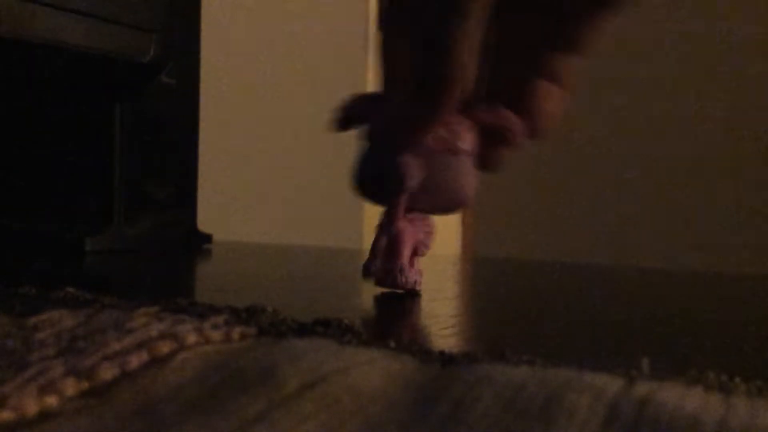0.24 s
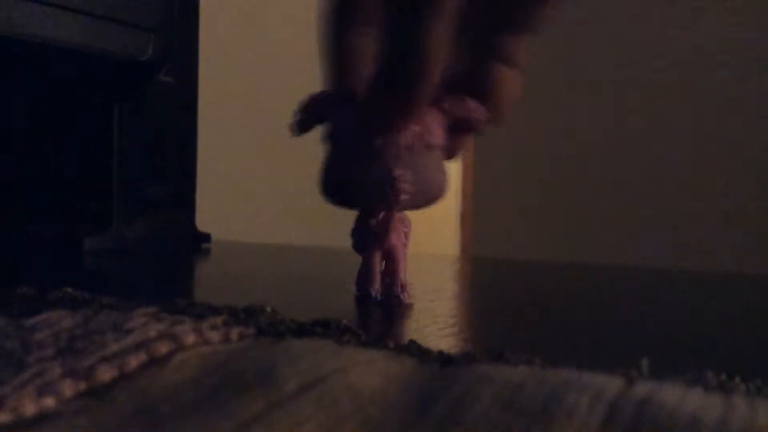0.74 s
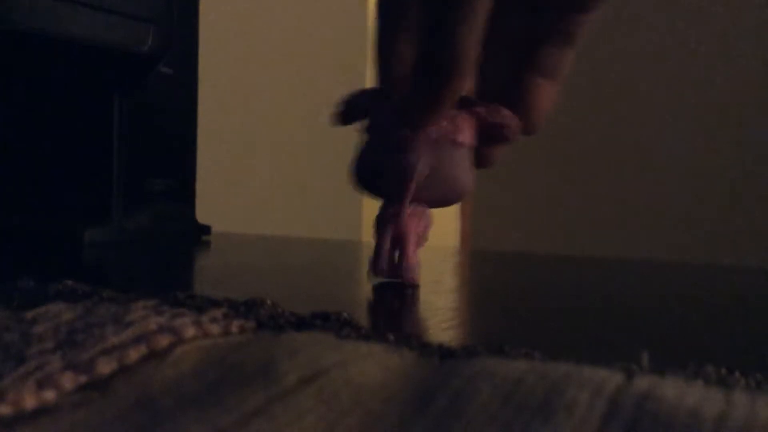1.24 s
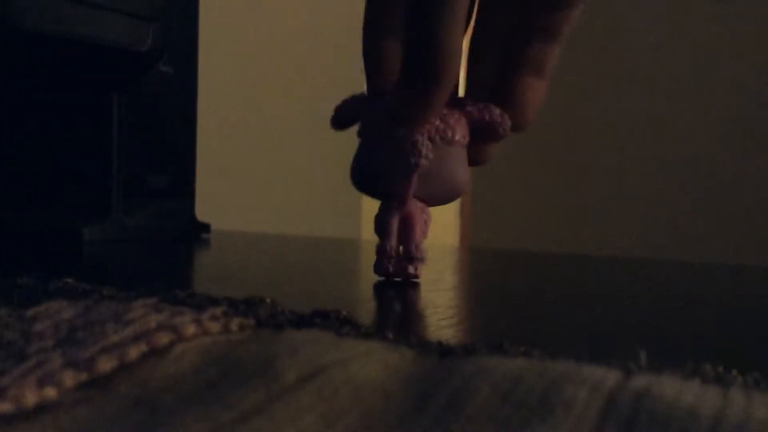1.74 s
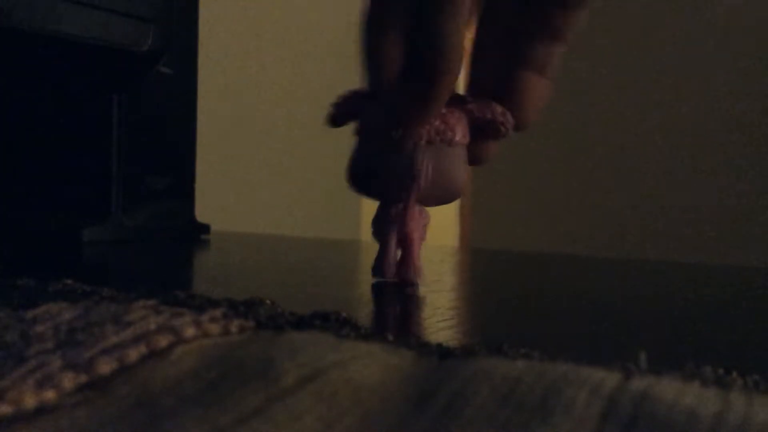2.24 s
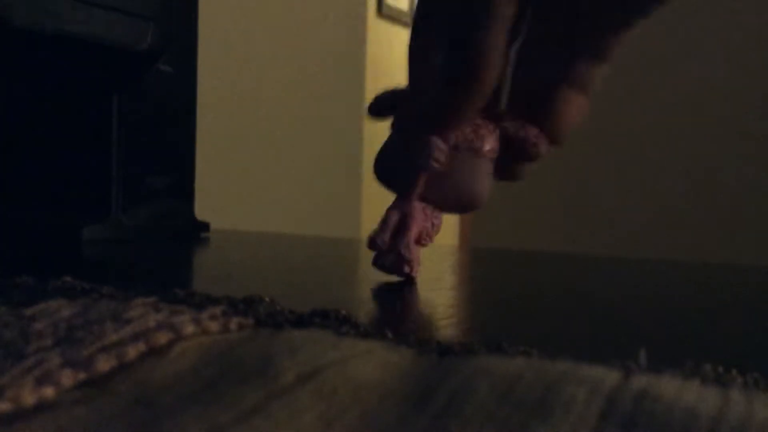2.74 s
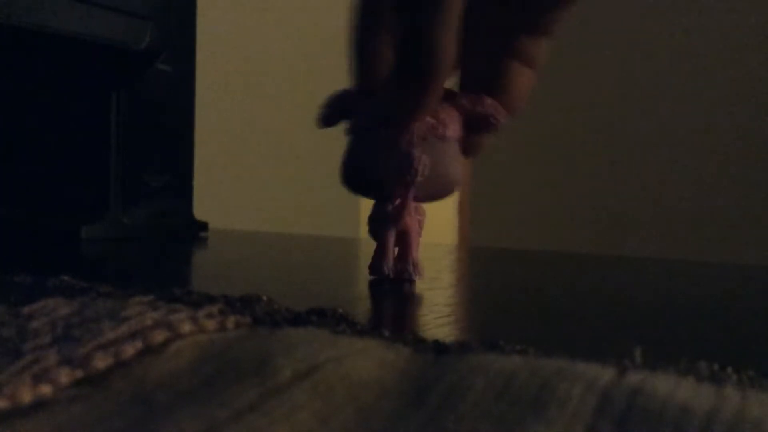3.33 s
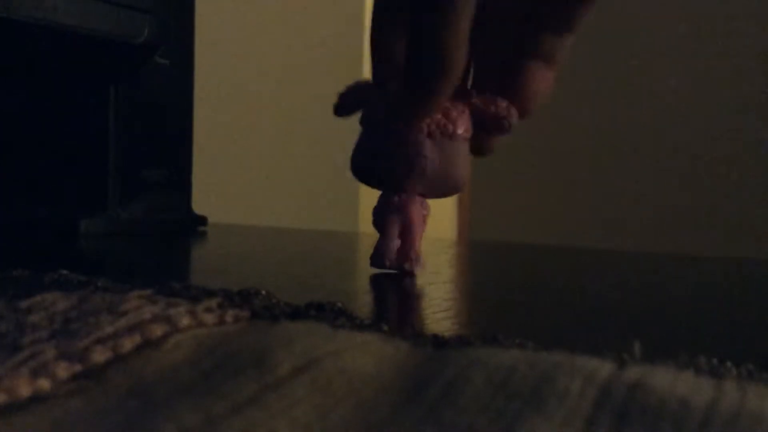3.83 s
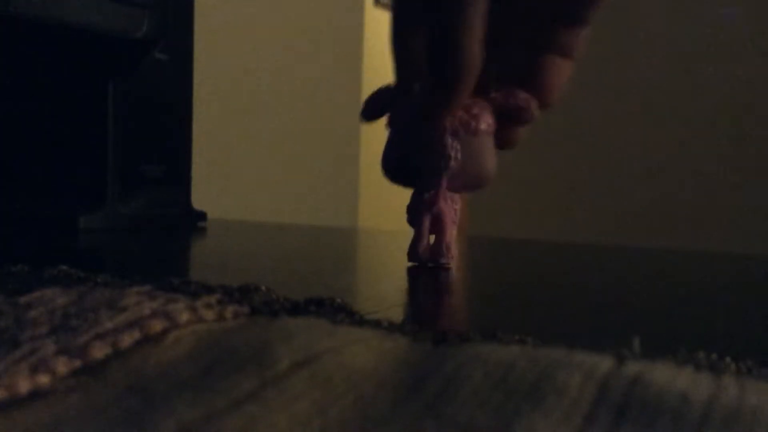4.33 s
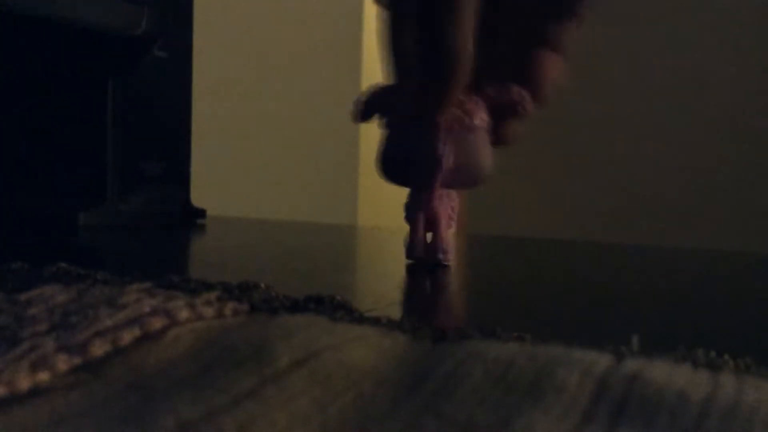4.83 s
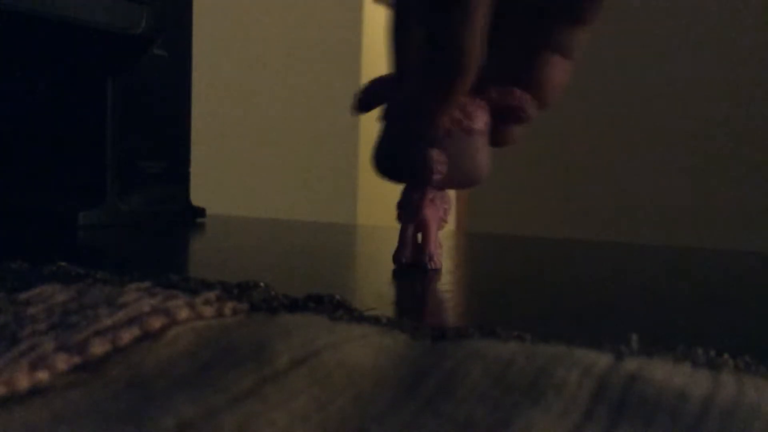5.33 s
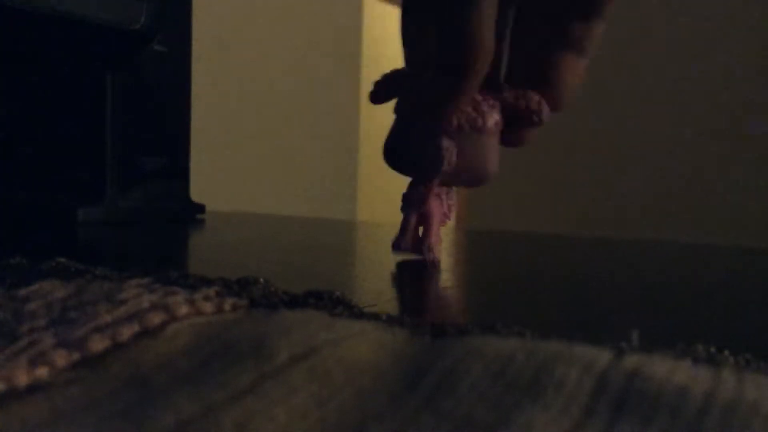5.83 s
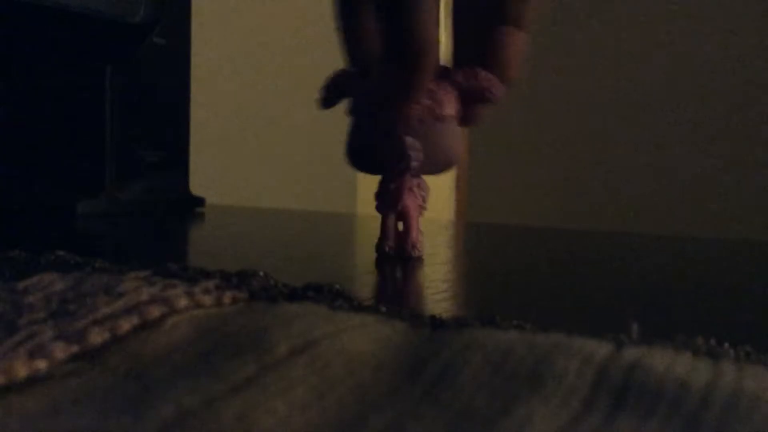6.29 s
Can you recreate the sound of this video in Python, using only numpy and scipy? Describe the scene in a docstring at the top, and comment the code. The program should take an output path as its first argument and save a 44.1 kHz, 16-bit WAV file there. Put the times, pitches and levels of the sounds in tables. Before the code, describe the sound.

Close, dry toy footsteps: dull little knocks with hollow plastic clacks and brief scuffs, hopping steadily on a hard floor in a quiet small room.

```python
"""A hand hops a small hollow plastic toy over a hard floor, close by, in a small room.
Each hop is a soft thud of decaying modes with a push-off a moment later; hard edges click and ring the toy.
Now and then a foot drags as a run of tiny random slips, and the plastic ticks in bursts of bright noise.
A diffuse tail of decaying noise follows steps and drags; filtered noise and wavering sines make the
room's faint hiss and hum."""
import sys
import numpy as np
from scipy import signal
from scipy.fft import rfft, irfft, next_fast_len
from scipy.io import wavfile
from scipy.ndimage import map_coordinates

SR = 44100
rng = np.random.default_rng(int(sys.argv[2]) if len(sys.argv) > 2 else 0)


def pcm_store(signal):
    """Save signal as 16-bit PCM."""
    levels = np.round(np.clip(np.atleast_2d(signal), -1, 1) * 32767)
    wavfile.write(sys.argv[1], SR, levels.astype(np.int16).T)


N = 288855  # scene length in samples

# A foot dragging on the floor; the first row, at the very start, is instead the hand rustling against the toy.
# Level is before the pressure curve, swell runs from start to end of the stroke: start_s, length_s, level_db,
# tilt_db_per_octave, swell_db, rasp_db
DRAGS_AND_RUSTLES = [(0, 0.098, -50, -3.5, -1.5, -1.5), (.888, 0.052, -48, -1.4, 5, -3),
                     (4.136, 0.045, -43.5, 0, 13, -4.5), (4.275, 0.043, -53, 1.5, -13, 5),
                     (5.181, 0.086, -52.5, -1, -8, 7), (6.031, 0.14, -51.5, 1.15, -16, 0.5),
                     (6.334, 0.045, -48, 1.5, -6, -3), (6.431, 0.034, -55, 0, -4, 5)]
# Relative colour of the dragging: freq_hz, level_db
DRAG_COLOUR = [(100, -35), (250, 7.5), (500, 5.5), (850, 1), (1300, 1.5), (1750, -10), (2350, -3.5),
               (3200, -13.5), (4000, -13), (7500, -26), (9700, -28.5), (15000, -40)]
# Where a hard-pressed foot rasps, and how widely
RASP_HZ, RASP_OCTAVES = 2400, 0.31

# The room's answer, levels relative: freq_hz, t60_s, level_db
ROOM_DECAY = [(122, 0.37, -7), (264, 0.13, -12), (476, 0.37, 17), (820, 0.3, 7.5), (1420, 0.17, 15.5),
              (3350, 0.19, 14.5), (6100, 0.2, 3), (12100, 0.15, 14)]
# Relative colour of the room's air noise: freq_hz, level_db_per_hz
AIR_COLOUR = [(30, -14), (50, -20.5), (80, -11.5), (105, -13.5), (150, -2.5), (260, 3.5), (380, -7.5),
              (650, -9), (900, -9), (1200, -17.5), (1550, -18.5), (1800, -24.5), (5000, -34), (9000, -37),
              (15500, -47.5)]
# Faint hum and whine: pitch_hz, level_db (rms, ahead of the microphone)
HUM_LINES = [(155, -69.5), (256, -61.5), (790, -70), (940, -70.5), (1480, -79.5), (2210, -84.5),
             (8642, -101)]

# Where thud, hollow ring, clack, snap and click lie: freq_hz
BLOW_BANDS_HZ = [260, 830, 1300, 2350, 4500]
# The toy standing on the boards; pitch and level are centres, life is the time to fall to 1/e:
# pitch_hz, level_db, life_s
TOY_AND_BOARD_MODES = [(162.6, -28.5, 0.041), (223, -17, 0.035), (257.5, -.5, 0.031), (335.5, -8.5, 0.036),
                       (366, -7, 0.021), (518, -1, 0.014), (689, -8, 0.015), (839.3, 4, 0.011),
                       (1251, 5, 0.0064), (1316, 2, 0.0036), (1610, 1.5, 0.0049), (2053, -2.5, 0.0061),
                       (2390, 9, 0.0026), (2864, 11, 0.0011), (3610, -0.5, 0.0047), (4550, 8, 0.0016),
                       (4760, 7.5, 0.00089), (5850, -43, 0.0014), (9740, 1.5, 0.0011),
                       (10500, 6.5, 0.00047)]
# Each hop, a soft landing and a later push-off: start_s, landing_db, push_off_db
TOY_HOPS = [(.156, -36.5, -43.5), (.374, -38.5, -43), (0.5995, -36.5, -46), (.794, -41.5, -45),
            (0.9964, -38.5, -46.5), (1.2799, -39.5, -57), (1.505, -39, -55), (1.737, -45.5, -55),
            (1.992, -39, -59), (2.2459, -38, -43.5), (2.476, -37.5, -48), (2.712, -38.5, -44),
            (2.9544, -40, -47.5), (3.182, -43.5, -53.5), (3.367, -48, -52), (3.58, -46.5, -50),
            (3.7938, -41.5, -53), (4.0445, -40.5, -49), (4.527, -48.5, -69), (4.6951, -40, -67),
            (4.9248, -36.5, -47.5), (5.1465, -38.5, -64), (5.3844, -39.5, -71), (5.597, -37, -64),
            (6.001, -30.5, -44)]
# How long the toy stays down before it pushes off
STANCE_S = .097
# Force of a soft landing in each blow band, relative to the hop's level: level_db
LANDING_SHAPE_DB = [-0.5, -16.5, -15, -40, -55]
# Force of a push-off in each blow band, relative to the hop's level: level_db
PUSH_OFF_SHAPE_DB = [-2, -6, -17, -22.5, -35]
# A hard edge of the toy striking the floor, or a sharp push-off as it leaves; hollow lifts the ring and lowers
# the clack by the same amount: # start_s, level_db, thud_db, hollow_db, tilt_db_per_octave
EDGE_TAPS = [(.1638, -35, -37, 4.5, -2), (.3794, -33.5, -43, 6, -2), (.6124, -35.5, -39.5, -1.5, -5.5),
             (.811, -47, -55, 0, -13.5), (1.0064, -33.5, -41.5, 1.5, -4.5), (1.143, -56.5, -49, 6, -15),
             (1.339, -58, -44, 9.5, -20), (2.1057, -47, -44.5, 1, -14), (2.2679, -39.5, -60, 3.5, -5),
             (2.489, -34.5, -53, 10, -1), (2.7298, -49.5, -55, -3, -7.5), (3.2233, -56.5, -59, 2, -20),
             (3.8555, -56, -60, 2, -20), (4.0697, -62, -47, -9, -16), (4.138, -46, -47, 2.5, -19),
             (4.1738, -34.5, -27, 4.5, -5), (4.27, -35.5, -80, 1, -10), (4.9543, -53.5, -61, 0, -13),
             (5.064, -58, -64, 8, -17), (5.1787, -48.5, -72, -1.5, -12.5), (5.194, -56, -69, 9, -15),
             (5.2405, -45, -40, 4, -18), (5.3852, -47.5, -57, -2, -19), (5.4135, -52.5, -57, -2, -15),
             (5.609, -35, -74, 4, -10), (5.8231, -45, -48, -1.5, -11.5), (6.0052, -33.5, -38.5, 0.5, -3),
             (6.2244, -38.5, -40, 7, -4.5), (6.3369, -50, -47, 2, -16), (6.4362, -54, -48, 1, -9)]

# The plastic ticking in the fingers as the grip shifts: start_s, level_db, centre_hz
PLASTIC_TICKS = [(.708, -60, 6500), (1.143, -58, 6000), (1.587, -63, 7000), (2.783, -57, 13000),
                 (2.809, -60, 8500), (5.385, -61, 6750)]

# The microphone keeps nothing from here up
TOP_HZ = 16100


def amp(db):
    """Decibels to gain."""
    return 10 ** (np.asarray(db) / 20)


def unit(x):
    """Scale to rms 1."""
    return x / np.sqrt(np.mean(x ** 2) + 1e-20)


def along(points, hz):
    """Read (frequency, value) points on a log-frequency axis."""
    point_hz, values = np.transpose(points)
    return np.interp(np.log(hz + 1), np.log(point_hz + 1), values)


def bell(hz, centre_hz, octaves):
    """A Gaussian hump on an octave scale, 1 at its centre."""
    return np.exp(-.5 * (np.log2((hz + 1) / centre_hz) / octaves) ** 2)


def filtered(x, response):
    """Shape the spectrum of x by a response of frequency."""
    size = next_fast_len(len(x) + 8192)
    spectrum = rfft(x, size) * response(np.fft.rfftfreq(size, 1 / SR))
    return irfft(spectrum, size)[:len(x)]


def wobble(rate):
    """A smooth random curve, rate knots a second."""
    knots = rng.standard_normal(int(N * rate / SR) + 4)
    return map_coordinates(knots, [np.arange(N) * rate / SR])


def add(track, start_s, sound):
    """Mix a sound into the track at its start time."""
    part = track[max(round(start_s * SR), 0):][:len(sound)]
    part += sound[:len(part)]


def drags(slip_rate=1800, grit_db=2.0, arch=0.51, uneven_db=3.5, wet_db=-12.0):
    """A sliding foot, or the hand rubbing the toy, catches and slips in a dense run of tiny ticks."""
    track = np.zeros(N)
    t = np.arange(SR // 3) / SR
    for start_s, length_s, level_db, tilt_db, swell_db, rasp_db in DRAGS_AND_RUSTLES:
        slips = (rng.random(len(t)) < slip_rate / SR) * rng.choice([-1, 1], len(t))
        slips = slips * amp(grit_db * rng.standard_normal(len(t)))
        rasping = filtered(slips, lambda hz: amp(rasp_db * bell(hz, RASP_HZ, RASP_OCTAVES)))
        rub = unit(filtered(
            rasping, lambda hz: amp(along(DRAG_COLOUR, hz) + tilt_db * np.log2((hz + 1) / 1000))))
        # the hand bears down and lifts again, a little unevenly
        stroke = np.minimum(t / length_s, 1)
        unevenness_db = swell_db * (stroke - .5) + uneven_db * wobble(95)[:len(t)]
        pressure = np.abs(np.sin(np.pi * stroke)) ** arch * amp(unevenness_db)
        scrape = amp(level_db) * rub * pressure
        add(track, start_s, scrape + amp(wet_db) * reverb(scrape))
    return track


def reverb(sound, delay_s=0.002, build_s=0.01):
    """The room's diffuse answer: noise decaying band by band, swelling in as the first walls reply."""
    hz, t, noise = signal.stft(rng.standard_normal(SR // 3), SR, nperseg=256)
    room = np.array(ROOM_DECAY)
    level_db = along(room[:, [0, 2]], hz)[:, None]
    t60 = along(room[:, :2], hz)[:, None]
    tail = signal.istft(noise * amp(level_db - 60 * t / t60), SR, nperseg=256)[1]
    tail = tail * np.clip((np.arange(len(tail)) / SR - delay_s) / build_s, 0, 1)
    return signal.fftconvolve(sound, tail / np.linalg.norm(tail))[:len(sound)]


def room_tone(air_db=-53.0, swell_db=0.38, waver_rad=0.52):
    """Air noise with a few hum lines whose phase wanders slightly."""
    t = np.arange(N) / SR
    air = unit(filtered(rng.standard_normal(N), lambda hz: amp(along(AIR_COLOUR, hz))))
    # only the low part stirs; the hiss stays smooth
    low = filtered(air, lambda hz: 1 / (1 + (hz / 1200) ** 2))
    air = air + low * (amp(swell_db * wobble(12.0)) - 1)
    hum = np.zeros(N)
    for pitch_hz, level_db in HUM_LINES:
        phase = 2 * np.pi * pitch_hz * t + waver_rad * wobble(11)
        hum += amp(level_db) * unit(np.sin(phase))
    return amp(air_db) * air + hum


def steps(crack_db=-3, crack_t60_s=0.025, crack_low_hz=1400, crack_high_hz=5400,
          ring_wet_db=-14, ring_wet_hz=1200, snap_wet_db=-13, snap_share=0.73):
    """Each floor contact rings the modes and adds a crack, louder on harder blows, that scatters in the room."""
    track = np.zeros(N)
    t = np.arange(SR // 16) / SR
    band = signal.butter(2, [crack_low_hz, crack_high_hz], "bandpass", fs=SR, output="sos")
    dull = signal.butter(2, ring_wet_hz, fs=SR, output="sos")
    # averaged over all directions the crack is one smooth snap (energy of rms 1 over 10 ms)
    snap = signal.sosfilt(band, signal.unit_impulse(len(t) + SR // 3))
    snap = snap / np.linalg.norm(snap) * np.sqrt(SR / 100)
    for start_s, blow_db in contacts():
        # countless small high modes blur into a short burst, as strong as the contact is hard
        hardness_db = snap_share * blow_db[-2] + (1 - snap_share) * blow_db[-1]
        burst = unit(signal.sosfilt(band, rng.standard_normal(len(t))))
        crack = burst * amp(hardness_db + crack_db - 60 * t / crack_t60_s)
        # leave space for the room's tail
        room_for_tail = [(0, 0), (0, len(snap) - len(t))]
        ring, crack = np.pad([ringing(blow_db, t), crack], room_for_tail)
        # the low modes keep their pitch in the room; the treble comes back as plain scatter
        low_sent = amp(ring_wet_db) * signal.sosfilt(dull, ring)
        snap_sent = amp(hardness_db + snap_wet_db) * snap
        add(track, start_s, ring + crack + reverb(low_sent + snap_sent))
    return track


def contacts():
    """Every touch of the floor as (start_s, force in dB per blow band): landings, push-offs and hard taps."""
    landings = [(s, db + np.array(LANDING_SHAPE_DB)) for s, db, _ in TOY_HOPS]
    pushes = [(s + STANCE_S, db + np.array(PUSH_OFF_SHAPE_DB)) for s, _, db in TOY_HOPS]
    # the spot that is struck favours the hollow ring or the clack; a sharper edge keeps more treble
    octaves = np.log2(np.divide(BLOW_BANDS_HZ[-2:], BLOW_BANDS_HZ[2]))
    taps = []
    for start_s, level_db, thud_db, hollow_db, tilt_db in EDGE_TAPS:
        treble_db = level_db + tilt_db * octaves
        taps.append((start_s, [thud_db, level_db + hollow_db, level_db - hollow_db, *treble_db]))
    return landings + pushes + taps


def ringing(blow_db, t, scatter_db=1, detune=0.023, falloff=3.26, rise_cycles=0.3):
    """The blow's spectrum sets the modes going; they hold briefly, then die away quickly."""
    hz, mode_db, life_s = np.transpose(TOY_AND_BOARD_MODES)
    # the grip changes a little with each contact: this alters the toy's modes, not the low ones of the boards
    grip = (hz > 600) * rng.standard_normal((2, len(hz)))
    force_db = along(np.transpose([BLOW_BANDS_HZ, blow_db]), hz)
    level = amp(mode_db + force_db + scatter_db * grip[0])
    hz = hz * (1 + detune * grip[1])
    cycles = hz[:, None] * t
    rise = 1 - np.exp(-(cycles / rise_cycles) ** 2)
    hold = np.exp(-(t / life_s[:, None]) ** falloff)
    motion = np.sin(2 * np.pi * cycles) * rise * hold
    # a small body radiates by its velocity, so it sends out no deep bass
    return np.gradient((level / (2 * np.pi * hz)) @ motion, 1 / SR)


def grip_ticks(t60_s=0.0094, width_octaves=0.45):
    """Tiny bright ticks of the held plastic, too light to ring the toy or the boards."""
    track = np.zeros(N)
    t = np.arange(SR // 16) / SR
    for start_s, level_db, centre_hz in PLASTIC_TICKS:
        fizz = filtered(rng.standard_normal(len(t)), lambda hz: bell(hz, centre_hz, width_octaves))
        add(track, start_s, unit(fizz) * amp(level_db - 60 * t / t60_s))
    return track


def scene():
    """Drags, steps and ticks over the room tone, in mono."""
    return (drags() + room_tone() + steps() + grip_ticks())[None]


def record(dry):
    """A small microphone that loses the deep bass and keeps nothing above its band limit."""
    highpass = signal.butter(3, 85, "highpass", fs=SR, output="sos")
    thin = signal.sosfilt(highpass, dry[0])
    return filtered(thin, lambda hz: hz < TOP_HZ)[None]


dry = scene()
out = record(dry)
pcm_store(out)
```